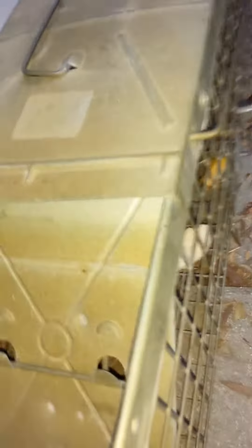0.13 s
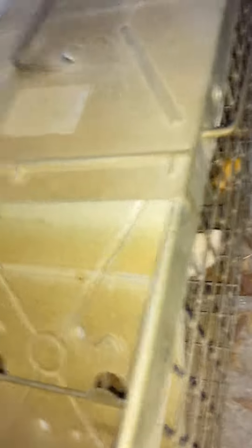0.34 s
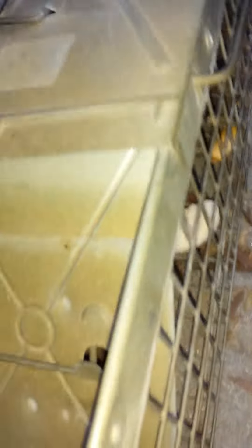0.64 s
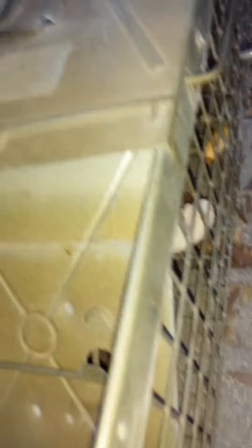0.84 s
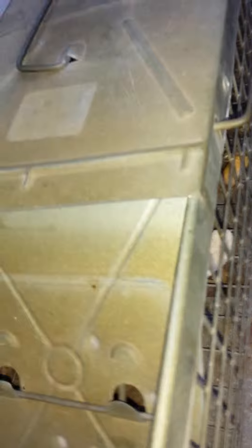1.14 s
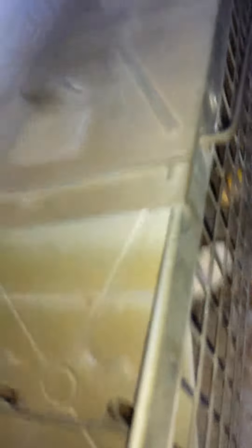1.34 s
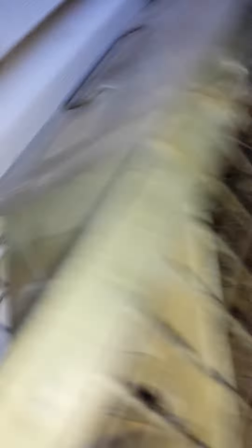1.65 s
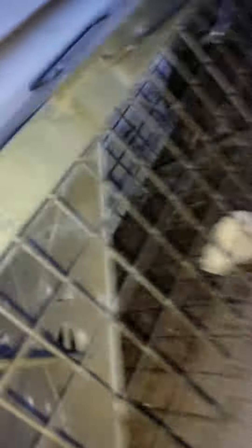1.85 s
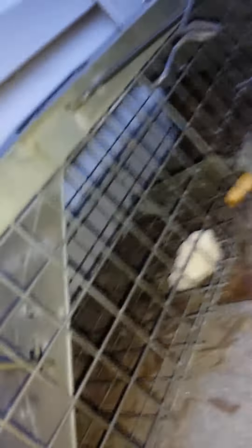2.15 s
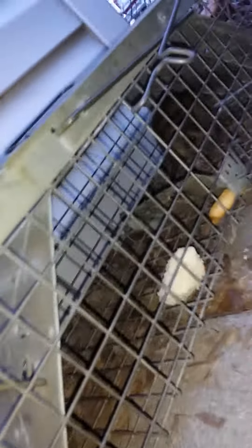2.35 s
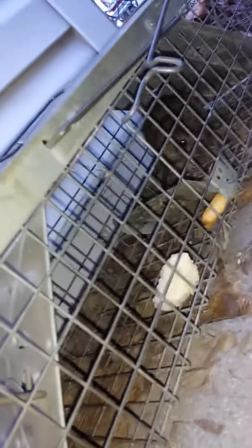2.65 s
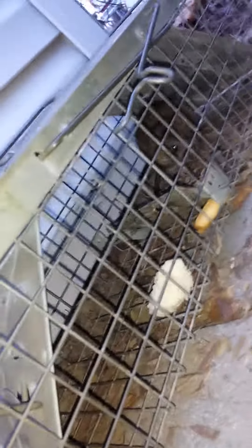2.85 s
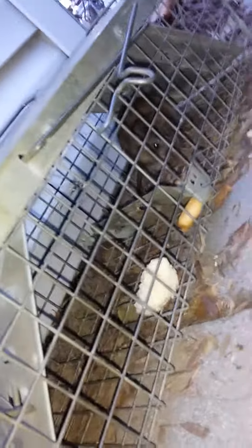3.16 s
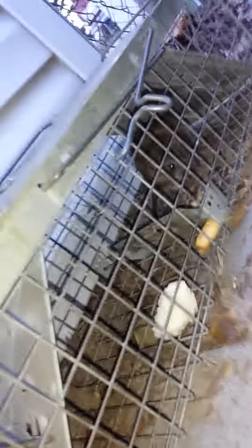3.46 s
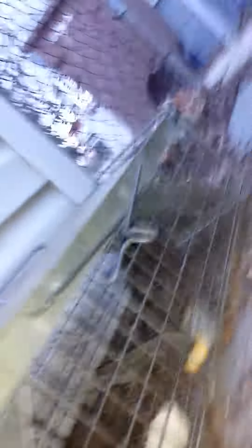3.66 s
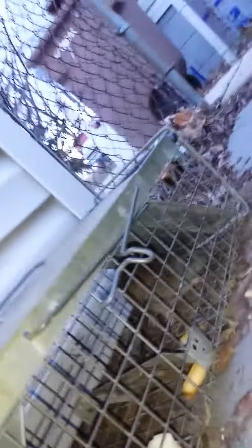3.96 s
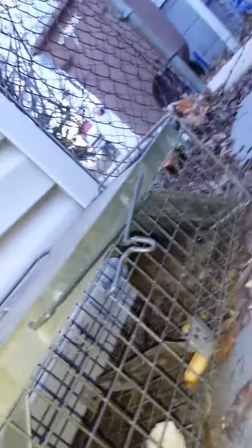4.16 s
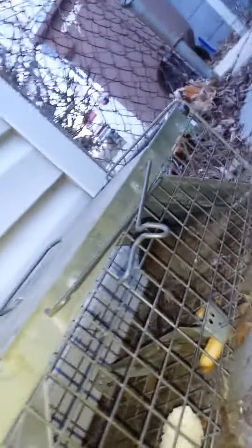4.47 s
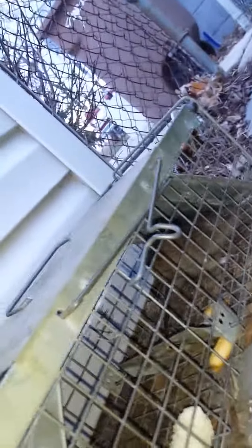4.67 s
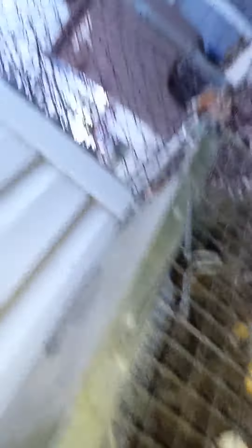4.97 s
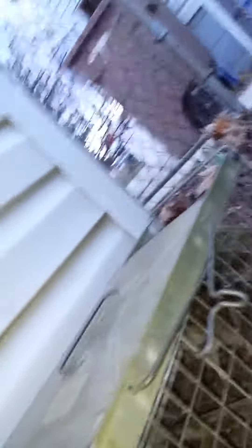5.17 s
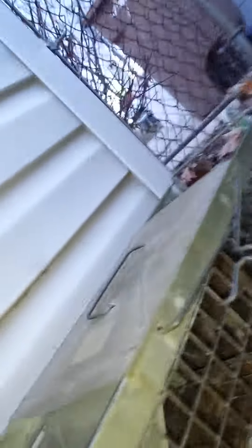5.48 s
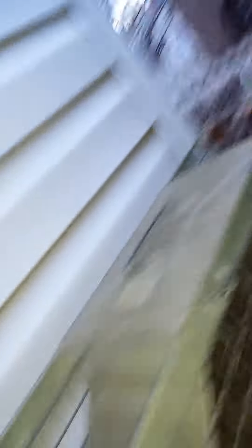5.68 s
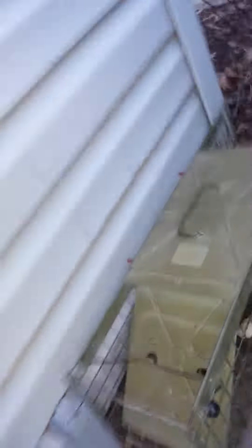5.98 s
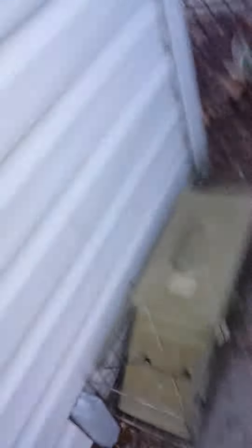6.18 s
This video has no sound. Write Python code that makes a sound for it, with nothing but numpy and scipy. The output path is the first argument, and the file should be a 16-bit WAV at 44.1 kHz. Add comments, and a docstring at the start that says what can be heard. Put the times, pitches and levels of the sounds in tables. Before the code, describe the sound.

A caged rat gives thin raspy squeals, then three harsh, piercing screams, over faint outdoor rumble, leaf rustle and finger ticks on the phone.

```python
"""Squealing rat in a wire cage

A rat in a cage beside a wall squeals, then screams three times, heard outdoors on a handheld phone. Its voice
is a whistle with overtones that jumps in pitch, a second whistle and a noisy rasp. Shaped noise makes the
distant traffic and rustling leaves and clothes; short noise bursts set off damped rings for the finger ticks
and bumps on the phone."""
import sys
import numpy as np
from scipy import signal
from scipy.fft import rfft, irfft
from scipy.io import wavfile
from scipy.ndimage import uniform_filter1d, map_coordinates

SR = 44100
rng = np.random.default_rng(int(sys.argv[2]) if len(sys.argv) > 2 else 0)


def int16_out(signal):
    """Quantize to a 16-bit WAV file."""
    q = np.round(np.clip(np.atleast_2d(signal).T, -1, 1) * 32767)
    wavfile.write(sys.argv[1], SR, q.astype(np.int16))


N = 279682  # samples, about 6.3 s
SCREAMS_FROM_S = 4.0  # squeals before this time, screams after, each with its own overtone colour


def from_db(db):
    """Turn decibels into a gain."""
    return 10 ** (np.asarray(db) / 20)


def rms_one(x):
    """Scale a sound so its average strength (rms) is 1."""
    return x / np.sqrt(np.mean(x ** 2) + 1e-20)


def at_hz(points, hz):
    """Read a table of (pitch, level) between its points, on a log-frequency axis."""
    table_hz, table_db = np.transpose(points)
    return np.interp(np.log(hz), np.log(table_hz), table_db)


def filtered(x, order, cut_hz, kind):
    """Pass a sound through a Butterworth filter, which has no ripples in the band it keeps."""
    return signal.sosfilt(signal.butter(order, cut_hz, kind, fs=SR, output="sos"), x)


def wobble(rate_hz):
    """Slow random drift: noise smoothed twice by a one-pole low-pass, rms 1."""
    r = np.exp(-2 * np.pi * rate_hz / SR)
    noise = rng.standard_normal(N + SR)
    settled = signal.lfilter([1], [1, -2 * r, r * r], noise)[SR:]
    return rms_one(settled)


def stretches(tables, *per_table):
    """Draw curves through timed tables, plus one value per table; the gate is 1 inside them."""
    t, gate = np.arange(N) / SR, np.zeros(N)
    tracks = np.ones((len(tables[0][0]) - 1 + len(per_table), N))
    for k, rows in enumerate(tables):
        s, *columns = np.transpose(rows)
        inside = (t >= s[0] - .001) & (t <= s[-1] + .001)
        curves = [np.interp(t[inside], s, column) for column in columns]
        constants = [values[k] + 0 * t[inside] for values in per_table]
        tracks[:, inside] = curves + constants
        gate[inside] = 1
    return gate, tracks


def soften(envelope):
    """Round sudden level steps over three milliseconds."""
    return uniform_filter1d(envelope, size=130)


def coloured(spectrum, shape=()):
    """Noise shaped by a table of dB per Hz, then scaled to rms 1."""
    hz = np.maximum(np.arange(N // 2 + 1) * SR / N, 1)
    white = rfft(rng.standard_normal(shape + (N,)))
    return rms_one(irfft(white * from_db(at_hz(spectrum, hz)), N))


def band_noise(low_hz, high_hz):
    """Noise kept between two frequencies, rms 1."""
    return rms_one(filtered(rng.standard_normal(N), 2, [low_hz, high_hz], "band"))


def panned(x, pan_db):
    """Share a left-minus-right level difference equally between the two channels."""
    return x * from_db(np.array([[.5], [-.5]]) * pan_db)


def ring(clicks, hz, t60):
    """A resonance: one unit click sets off a sine that falls by 60 dB in t60 seconds."""
    r, w = from_db(-60 / (t60 * SR)), 2 * np.pi * hz / SR
    return signal.lfilter([0, np.sin(w)], [1, -2 * r * np.cos(w), r * r], clicks)


def background():
    """Lumpy traffic and wind rumble, partly alike on both sides, under a steady hiss."""
    # noise colour before the low/high split: pitch_hz, relative level [dB per Hz]
    traffic_colour = [(25, -27.5), (91, -0.5), (331, -14.5), (1200, -21), (3090, -25), (6730, -32),
                      (13900, -32), (15500, -59)]
    # rumble fader over time: time_s, fader_db
    rumble_fader = [(0.0, -50.5), (1.34, -44.5), (3.25, -46), (6.34, -51)]
    hz = np.maximum(np.arange(N // 2 + 1) * SR / N, 1)
    mid, side = rfft(coloured(traffic_colour, (2,)))
    low = 1 / (1 + (hz / 450) ** 4)
    deep = 1 / (1 + (hz / 100) ** 4)
    alike = .6 * low  # the two sides match more in the bass
    both = np.sqrt(1 + alike) * mid + np.sqrt(1 - alike) * side * [[1], [-1]]

    deep_rumble = from_db(1.5 * wobble(5)) * irfft(both * deep, N)
    upper_rumble = from_db(2.5 * wobble(13)) * irfft(both * (low - deep), N)
    hiss = from_db(-53) * irfft(both * (1 - low), N)
    s, fader_db = np.transpose(rumble_fader)
    fader = from_db(np.interp(np.arange(N) / SR, s, fader_db))
    return panned(fader * (deep_rumble + upper_rumble), -0.5) + hiss


def rustle():
    """Dry leaves and cloth: many tiny contacts, made as bright noise in clumps of short grains."""
    # swells and fades, some cut short: start_s, peak_s, end_s, peak level_db
    movements = [(1.42, 1.95, 1.941, -46), (1.942, 1.967, 2.21, -37.5), (1.982, 2.004, 2.25, -39.5),
                 (3.6, 3.617, 4.33, -51), (5.22, 5.253, 5.43, -44), (5.791, 6.176, 8, -48.5)]
    # noise colour: pitch_hz, relative level [dB per Hz]
    leaf_colour = [(290, -49), (500, -5), (2200, -5), (3900, 4), (6200, -12.5), (10000, -8), (14200, -13.5),
                   (15000, -46)]
    start_db, end_db = -9, -25.5  # against each peak
    swells = [[(start, db + start_db), (peak, db), (end, db + end_db)]
              for start, peak, end, db in movements]
    gate, (level_db,) = stretches(swells)
    level = uniform_filter1d(gate * from_db(level_db), size=300)
    clumps = from_db(3.0 * wobble(25) + 0.91 * wobble(360))
    shared, own = coloured(leaf_colour), coloured(leaf_colour, (2,))
    return panned(level * rms_one(clumps * (0.4 * shared + own)), -2.52)


def ticks():
    """Finger ticks: a short noisy contact sets off a quickly damped ring."""
    # ticks: start_s, peak level before panning [dB], ring pitch_hz, left minus right [dB]
    tick_table = [(0.166, -18.5, 3460, -32.5), (0.5954, -36, 3100, -19), (0.9726, -27.5, 2583, -1),
                  (1.343, -19, 10300, 17), (1.7598, -29, 3620, 4), (1.8574, -29, 3280, 18),
                  (3.583, -15.5, 3280, -23), (3.7592, -34.5, 4400, 27), (5.3203, -34, 3810, -10),
                  (6.0448, -24, 4000, -8), (6.106, -34, 3200, -19)]
    out, t = np.zeros((2, N + 2000)), np.arange(2000) / SR
    for s, peak_db, hz, pan_db in tick_table:
        contact = rng.standard_normal(len(t)) * from_db(-60 * t / 0.0013)
        body = ring(contact, hz, 0.0022) + 0.39 * contact
        tick = from_db(peak_db) * body / np.abs(body).max()
        start = round(s * SR)
        out[:, start:start + len(t)] += panned(tick, pan_db)
    return out[:, :N]


def bumps():
    """Bumps on the phone: a low push into the case with a scuff of skin on top."""
    # bumps: start_s, push peak before panning and bass cut [dB], scuff setting before its lift [dB]
    bump_table = [(1.445, -22, -46), (1.551, -22.5, -45.5), (2.472, -34.5, -74), (3.115, -32.5, -47.5),
                  (3.585, -26.5, -58), (6.147, -38.5, -48)]
    push_hz, push_t60_s, scuff_s, scuff_lift_db = 125, 0.011, 0.00507, 6.0
    out, t = np.zeros((2, N + 4000)), np.arange(4000) / SR
    puff = t / scuff_s * np.exp(1 - t / scuff_s)  # quick rise, slower fall
    for s, peak_db, scuff_db in bump_table:
        skin = rng.standard_normal(len(t)) * puff
        push = ring(signal.lfilter([.05], [1, -.95], skin), push_hz, push_t60_s)
        scuff = signal.lfilter([.7], [1, -.8], skin)
        bump = from_db(peak_db) * push / np.abs(push).max() + from_db(scuff_db + scuff_lift_db) * scuff
        start = round(s * SR)
        out[:, start:start + len(t)] += panned(bump, -14.5)
    return filtered(out[:, :N], 2, 40, "high")


def unsteadiness():
    """How irregularly the vocal folds move, held from each listed moment to the next."""
    # fold unsteadiness: start_s, amount [0 clean to 1 chaotic]
    chaos_table = [(0, .45), (.866, .25), (3.04, .05), (3.071, .8), (3.101, .3), (4.55, .4), (4.645, .66),
                   (4.7, .82), (4.789, .62), (4.872, .5), (4.936, .03), (5.004, .85), (5.38, .45),
                   (5.41, .7), (5.725, .5)]
    since, amount = np.transpose(chaos_table)
    return amount[np.searchsorted(since, np.arange(N) / SR, side="right") - 1]


def phase_of(pitch_hz, chaos):
    """Running phase of vocal folds whose pitch jitters fast and wanders slower when unsteady."""
    jitter = .055 * chaos ** 2 * wobble(260)
    wander = .025 * np.minimum(chaos, .3) * wobble(70)
    return 2 * np.pi * np.cumsum(pitch_hz * (1 + jitter + wander)) / SR


def shimmer(chaos):
    """Fast random strength changes that keep the mean power."""
    depth_db = 4.0 * chaos
    return from_db(depth_db * wobble(192.4) - depth_db ** 2 * np.log(10) / 20)


def spurts():
    """Brief slips of the folds, each a smooth hump of level."""
    # slips: start_s, hump peak level_db
    slip_table = [(0.833, -38), (0.846, -32), (3.11, -23), (3.132, -31), (3.147, -31), (3.158, -45),
                  (3.167, -43), (3.18, -37), (3.255, -43), (3.29, -39), (4.8326, -41), (4.839, -28),
                  (4.8535, -35)]
    spurt_s = 0.0081
    clicks = np.zeros(N)
    clicks[[round(s * SR) for s, _ in slip_table]] = from_db([db for _, db in slip_table])
    return np.convolve(clicks, np.hanning(round(spurt_s * SR)))[:N]


def division(phase, level):
    """Folds that repeat only every three to five cycles, adding lines between the overtones."""
    # divided stretches: start_s, end_s, cycles per repeat, depth at start [dB], depth at end [dB],
    # raggedness [0 to 1]
    divided = [(0.755, 0.97, 3., -9, -17, .6), (3.071, 3.1, 5., 0, 0, .9), (3.102, 3.32, 3., -14, -18, .4),
               (3.323, 3.495, 4., -17, -9, .9), (3.498, 3.58, 4., -9, -7, .15),
               (5.003, 5.22, 5., -5, -3, .7), (5.412, 5.73, 3., -11, -8, .9)]
    depth_lines = [[(start, db_from), (end, db_to)] for start, end, _, db_from, db_to, _ in divided]
    columns = np.array(divided)
    gate, (depth_db, cycles, ragged) = stretches(depth_lines, columns[:, 2], columns[:, 5])
    squealing = np.arange(N) / SR < SCREAMS_FROM_S
    slips = np.minimum(2 * spurts() / level, 1.6) * squealing  # slips deepen the pattern
    depth = soften(gate) * (from_db(depth_db + 6 * ragged * wobble(60)) + slips)
    pattern = np.cumsum(np.gradient(phase) / cycles) + 1.6 * ragged * wobble(140)
    return (1 + depth * np.cos(pattern)) / np.sqrt(1 + depth ** 2 / 2)  # keeps the power


def whistle(pitch, level, overtones_db, phase, chaos):
    """The main whistle: a base tone and four overtones, coloured differently in squeals and screams."""
    # overtone colour in the squeals: pitch_hz, level_db
    squeal_colour = [(3500, 3), (4900, 11), (5600, -6.5), (7500, -6), (10000, -15.5), (13000, -18.5)]
    # overtone colour in the screams: pitch_hz, level_db
    scream_colour = [(4300, 3), (5100, -20), (5800, -39), (6800, -13), (8800, -18), (10400, -9.5),
                     (11800, -25.5), (14000, -34)]
    squealing = np.arange(N) / SR < SCREAMS_FROM_S
    stack = np.zeros(N)
    for k in range(1, 6):
        hz = k * pitch
        colour_db = np.where(squealing, at_hz(squeal_colour, hz), at_hz(scream_colour, hz))
        partial_db = overtones_db + colour_db if k > 1 else 0
        strength = soften(level * from_db(partial_db) * (hz < SR / 3))
        stack += strength * shimmer(chaos) * np.sin(k * phase)
    return stack


def second_whistle(chaos, gate):
    """A second whistle in straight glides; gives its sound, level and phase."""
    # glides: start_s, end_s, from pitch_hz, to pitch_hz, from level_db, to level_db (before throbbing)
    glides = [(0.69, 0.717, 4350, 4261, -20.5, -64), (0.753, 0.81, 4120, 4250, -29, -34),
              (4.644, 4.769, 3610, 3200, -26, -28.5), (4.773, 4.936, 3365, 3290, -31, -36),
              (5.008, 5.058, 3620, 3830, -20, -11), (5.061, 5.21, 3600, 3880, -16, -23),
              (5.387, 5.399, 3100, 4100, -34, -32), (5.411, 5.729, 3600, 3330, -28, -31)]
    lines = [np.reshape(glide, (3, 2)).T for glide in glides]
    gate2, (pitch, level_db) = stretches(lines)
    chaos2 = .6 * chaos * gate + .25
    phase = phase_of(pitch, chaos2)
    throbbing = from_db(level_db + 4.5 * chaos * wobble(55))
    level = soften(gate2 * (throbbing + spurts())) * shimmer(chaos2)
    overtones = shimmer(chaos) * np.sin(2 * phase) + shimmer(chaos) * np.sin(3 * phase)
    return level * (np.sin(phase) + from_db(-23.5) * overtones), level, phase


def torn(noise):
    """Tear a noise into bands that each swell and break at their own moments."""
    # borders between neighbouring bands: pitch_hz
    edges_hz = [900, 2700, 3300, 4200, 6500, 9200, 15500]
    bands = [from_db(4.0 * wobble(40)) * filtered(noise, 2, edges, "band")
             for edges in zip(edges_hz, edges_hz[1:])]
    return rms_one(sum(bands))


def rasp(level, chaos):
    """Rough air noise that grows as the folds become unsteady."""
    # throat noise colour before tearing: pitch_hz, relative level [dB per Hz]
    throat_colour = [(1900, -64), (2520, -26), (2860, -15), (3720, -17.5), (5410, -40.5), (7640, -33.5),
                     (11200, -29.5), (15000, -62)]
    rasp_db = -42 + 43 * np.sqrt(chaos)  # against the whistle's level
    return soften(level * from_db(rasp_db)) * shimmer(.6) * torn(coloured(throat_colour))


def mouth(voice):
    """Cut the bass below 1.5 kHz in the squeals and below 2.25 kHz in the screams."""
    thin = filtered(voice, 8, 1500, "high")
    thin = filtered(thin, 2, [5700, 6700], "bandstop")  # the half-closed mouth cancels this band
    wide = filtered(voice, 8, 2250, "high")
    return np.where(np.arange(N) / SR < SCREAMS_FROM_S, thin, wide)


def rat():
    """The larynx: two whistles beat in one airflow, with rasp, crackle and dull breath."""
    # main whistle, one list per curve; close points are pitch jumps: time_s, pitch_hz, base tone level_db
    notes = [
        [(0.0, 2480, -36), (0.02, 1910, -40)],
        [(0.637, 1868, -37), (0.656, 1864, -38), (0.66, 1716, -38.5), (0.752, 1876, -31), (0.755, 2416, -37),
         (0.855, 2466, -43), (0.895, 2527, -40), (0.946, 2542, -41.5), (0.972, 2260, -39)],
        [(3.045, 2494, -46), (3.055, 2540, -47), (3.063, 2010, -30), (3.07, 2260, -42), (3.075, 1960, -33.5),
         (3.099, 2102, -33.5), (3.102, 2508, -36.5), (3.245, 2562, -33), (3.26, 2744, -32), (3.29, 2635, -34),
         (3.55, 2592, -34.5), (3.568, 2410, -40), (3.58, 1994, -36)],
        [(4.558, 2502, -44), (4.573, 2466, -40), (4.576, 2292, -27), (4.611, 2479, -35.5), (4.614, 2720, -23.5),
         (4.644, 2510, -38.5), (4.648, 2590, -11.5), (4.7, 2700, -9), (4.761, 3110, -12.5), (4.77, 2920, -11.5),
         (4.788, 2920, -38)],
        [(4.79, 2163, -31), (4.864, 2350, -31.5), (4.87, 2300, -63)],
        [(4.873, 5364, -44.5), (4.935, 5054, -45.5)],
        [(4.937, 3080, -7.5), (4.958, 2909, -1), (4.999, 2986, 4.5), (5.002, 2885, -8), (5.042, 3200, -9.5),
         (5.078, 3124, -9.5), (5.09, 2928, -10.5), (5.19, 2926, -14.5), (5.197, 2430, -22), (5.218, 2330, -20)],
        [(5.385, 2024, -40), (5.405, 2382, -18.5), (5.415, 2554, -15.5), (5.667, 2527, -18), (5.72, 2400, -20),
         (5.739, 2335, -25.5), (5.768, 1717, -37)],
    ]
    # one overtone strength per curve, before the overtone colour: level against the base tone [dB]
    overtone_strengths = [-11, -6.5, -3, -4, 4.5, 18.5, 0.5, -2]
    gate, (pitch, level_db, overtones_db) = stretches(notes, overtone_strengths)
    chaos = unsteadiness()
    phase, level = phase_of(pitch, chaos), gate * from_db(level_db)
    stack = whistle(pitch, level, overtones_db, phase, chaos)
    second, level2, phase2 = second_whistle(chaos, gate)

    # the shared airflow gives every partial side tones at the two whistles' difference
    depth = np.minimum(level2 / soften(level + 1e-9), .3)
    beating = (1 + depth * np.cos(phase2 - phase)) * division(phase, level + 1e-9)
    voice = np.sqrt(2) * (stack * beating + second) + rasp(level, chaos)

    crackle = from_db(-6.5) * spurts() * band_noise(670, 6600)  # air bursts with each slip
    breath_db = -28.5 + 2.0 * wobble(36)
    breath = soften(level * chaos ** 2) * from_db(breath_db) * band_noise(1039, 1700)
    return mouth(voice) + crackle + breath


def heard(voice):
    """Direct sound reaching left and right apart, plus scatter off wall, ground and wires."""
    # where the cage is: time_s, left minus right [dB], time by which left lags [s]
    bearing = [(.8, -4, .0001), (3.3, -1, .00006), (4.75, -4.4, 0.), (5.1, -3.8, -.0001),
               (5.6, -9, -.00014)]
    s, pan_db, lag_s = np.transpose(bearing)
    n = np.arange(N)
    left = map_coordinates(voice, [n - SR * np.interp(n / SR, s, lag_s)], order=3)

    t = np.arange(3000) / SR
    scatter = rng.standard_normal((4, len(t))) * from_db(-60 * t / .03) * (t > .001)
    scatter = np.diff(scatter)  # thin wires throw back mostly treble
    scatter /= np.sqrt(np.sum(scatter ** 2, axis=1, keepdims=True))
    wet = from_db(-2) * signal.fftconvolve(voice[None], scatter)[:, :N]
    turn = 1.2 * wobble(5)  # animal and phone keep moving, so the scatter changes
    wet = np.cos(turn) * wet[:2] + np.sin(turn) * wet[2:]
    return panned(np.array([left, voice]) + wet, np.interp(n / SR, s, pan_db))


def scene():
    """Add up the background, rustling, handling and the rat."""
    return background() + rustle() + ticks() + bumps() + heard(rat())


def record(dry):
    """Gain control turns loud moments down and recovers slowly; peaks are rounded, the top is cut."""
    knee_db, slope, release_db_s = -22, .25, 12
    ceiling, cutoff_hz = .9, 15700
    power = uniform_filter1d(np.mean(dry ** 2, axis=0), size=441)
    level_db = 10 * np.log10(power + 1e-12)
    cut_db = slope * np.maximum(level_db - knee_db, 0)
    # a running maximum on a rising ramp lets the cut fall only at the release speed
    ramp = release_db_s * np.arange(N) / SR
    held_db = uniform_filter1d(np.maximum.accumulate(cut_db + ramp) - ramp, size=220)
    rounded = ceiling * np.tanh(dry * from_db(-held_db) / ceiling)
    return signal.sosfilt(signal.cheby2(12, 70, cutoff_hz, fs=SR, output="sos"), rounded)


dry = scene()
out = record(dry)
int16_out(out)
```